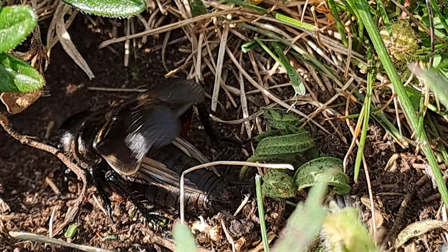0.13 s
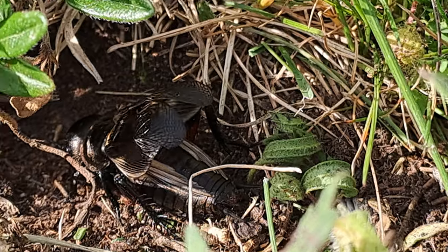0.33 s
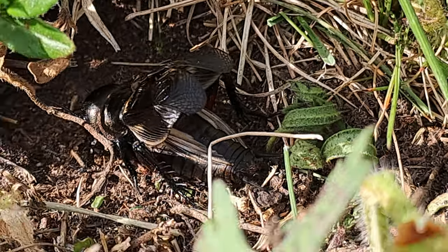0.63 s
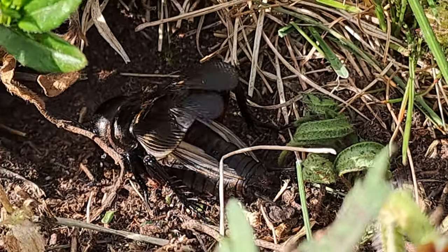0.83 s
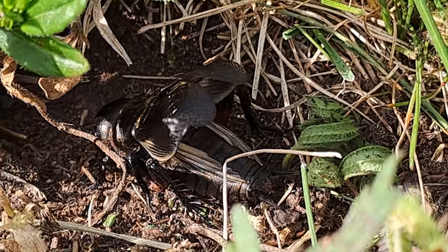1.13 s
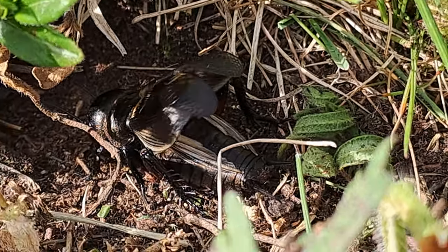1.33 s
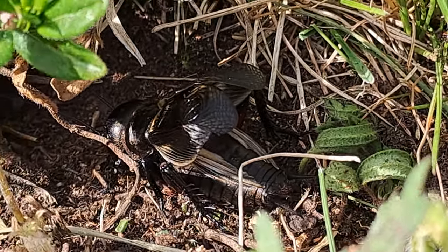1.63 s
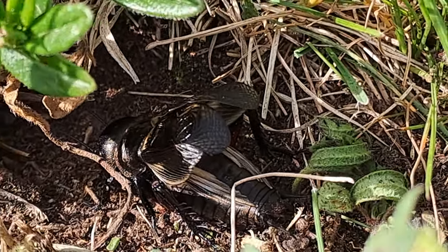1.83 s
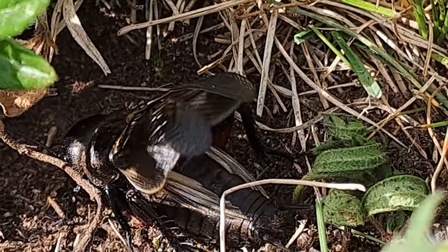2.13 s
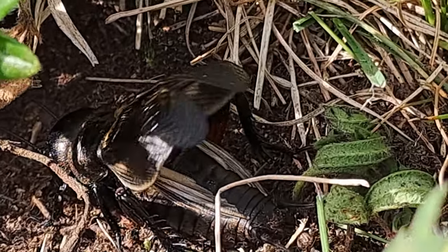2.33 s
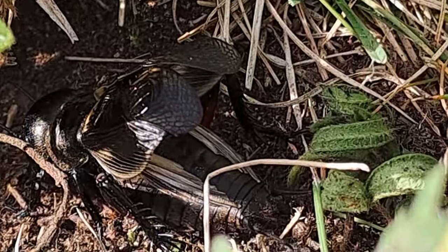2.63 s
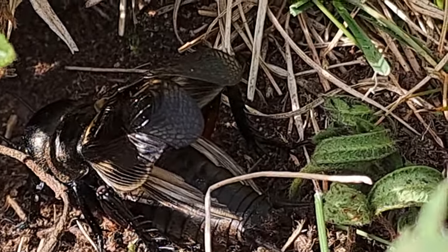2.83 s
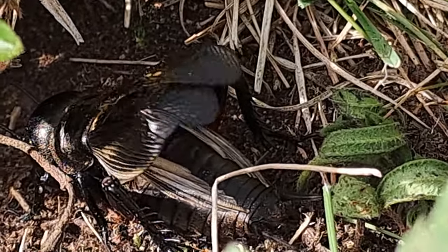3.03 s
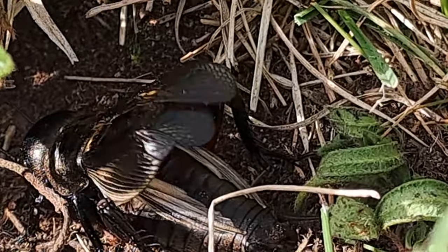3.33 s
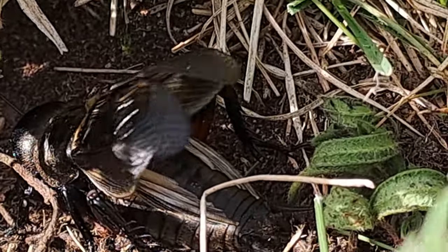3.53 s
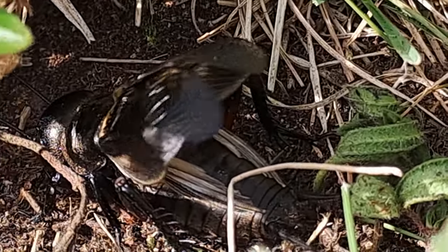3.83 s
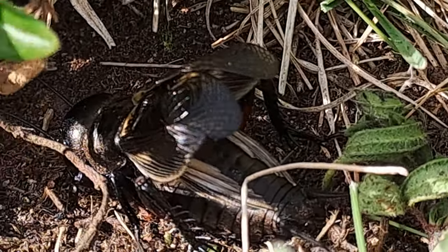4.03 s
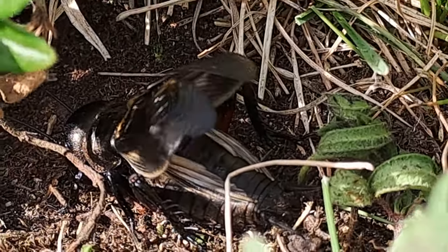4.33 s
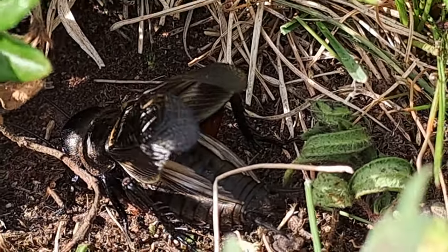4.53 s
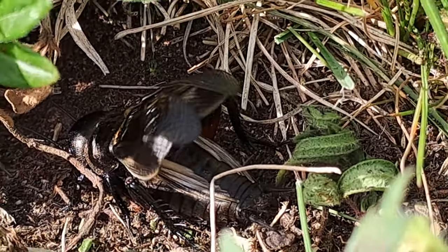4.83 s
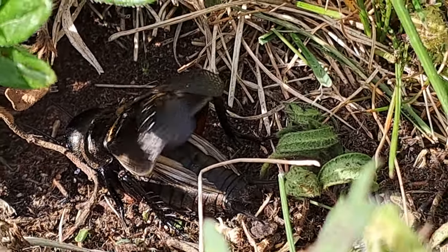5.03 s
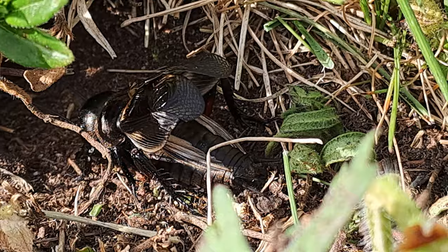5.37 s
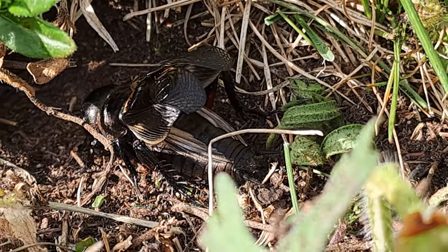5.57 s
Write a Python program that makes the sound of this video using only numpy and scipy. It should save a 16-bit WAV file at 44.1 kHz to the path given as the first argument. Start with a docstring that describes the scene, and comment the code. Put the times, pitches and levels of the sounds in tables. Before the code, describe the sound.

After a brief silence, one near field cricket trills sharp metallic chirps about three a second, with distant crickets and low buffeting wind.

```python
"""After a short silence, wind, meadow hiss and far crickets fade in, and a near cricket starts to chirp.
The hiss and the far chorus are coloured noise; the wind adds rumble, buffeting and pops at two microphone ports.
The near cricket sings four-stroke chirps: ringing tones that slow down, with scraping noise over them.
Three neighbours a few metres away sing steadier falling tones, and single hard eddies knock on one port.
"""
import sys
import numpy as np
from scipy import signal
from scipy.fft import rfft, irfft, next_fast_len
from scipy.io import wavfile
from scipy.ndimage import uniform_filter1d

SR = 44100
rng = np.random.default_rng(int(sys.argv[2]) if len(sys.argv) > 2 else 0)


def persist_wave(psi):
    """Save psi, clipped to +-1, as 16-bit WAV."""
    counts = np.round(np.clip(psi, -1, 1) * 32767).astype(np.int16)
    wavfile.write(sys.argv[1], SR, np.atleast_2d(counts).T)


N = 251370  # length in samples, 5.7 s


def gain_of(db):
    """Turns decibels into a factor to multiply by."""
    return 10 ** (np.asarray(db) / 20)


def evened(x):
    """Scales a sound so that its average strength (rms) is 1."""
    return x / np.sqrt(np.mean(x ** 2) + 1e-20)


def noise():
    """Plain hiss, drawn separately for each port."""
    return rng.standard_normal((2, N))


def coloured(x, points):
    """Filters each row to a given spectrum, ringing only after each kick; the result has rms 1."""
    point_hz, point_db = np.transpose(points)
    size = 2 * next_fast_len(x.shape[-1] // 2 + 2048)
    hz = np.fft.rfftfreq(size, 1 / SR)
    curve_db = np.interp(np.log(hz + 1), np.log(point_hz), point_db)
    cepstrum = irfft(np.log(gain_of(curve_db)), size)
    cepstrum[1:size // 2] *= 2  # this folding moves all the ringing to after the kick
    cepstrum[size // 2 + 1:] = 0
    response = np.exp(rfft(cepstrum))
    return evened(irfft(rfft(x, size) * response, size)[..., :x.shape[-1]])


def wobble(shape, ms):
    """Smooth random ups and downs of rms 1 that change over about ms milliseconds."""
    x = rng.standard_normal(shape)
    size = max(int(ms * SR / 1000), 1)
    for _ in range(3):
        x = uniform_filter1d(x, size)
    return evened(x)


def add(mix, s, sound):
    """Mixes a stereo sound in at time s, cut off at the end of the mix."""
    part = mix[:, round(s * SR):][:, :sound.shape[1]]
    part += sound[:, :part.shape[1]]


def ports(z, left_db, lead):
    """Gives a complex tone to both ports: left_db louder and lead radians earlier on the left."""
    left = z * gain_of(left_db / 2) * np.exp(1j * lead)
    right = z * gain_of(-left_db / 2)
    return np.real([left, right])


def echoes(x, t60, level_db):
    """Adds the scatter of grass and ground: a short dying tail of noise for each port."""
    t = np.arange(round(.08 * SR)) / SR
    tail = rng.standard_normal((2, len(t))) * gain_of(-60 * t / t60) * (t > .001)
    tail = tail / np.linalg.norm(tail[0])
    return x + gain_of(level_db) * signal.oaconvolve(x, tail, axes=1)[:, :N]


# Colour of the meadow hiss: (frequency [Hz], relative level [dB per Hz])
AIR_COLOUR = [(1000, -29.5), (2100, -19.5), (3400, -28), (8500, -23), (12500, -31), (13600, -36.5),
              (15900, -40)]
# Slow sag and return of the hiss's and neighbours' level: (time [s], level change [dB])
LEVEL_SAG = [(0, 2), (1.5, -2), (3, -3), (4.2, -1.5), (5.7, 4)]
AIR_BASE_DB = -64.5  # before the slow changes


def air():
    """Meadow hiss: coloured noise whose level sags mid-way and rises again, with small random drifts."""
    sag_db = np.interp(np.arange(N) / SR, *np.transpose(LEVEL_SAG))
    level_db = AIR_BASE_DB + 1.5 * wobble(N, 40.) + sag_db
    return gain_of(level_db) * coloured(noise(), AIR_COLOUR)


# Colour of many far crickets blurred together: (frequency [Hz], relative level [dB per Hz])
CHORUS_COLOUR = [(3500, -24), (3950, -2), (4400, 8), (4900, -1.5), (5200, -13), (5600, -44.5)]


def chorus():
    """Far crickets: a haze of noise whose level throbs quickly and swells more slowly at random."""
    throb_db = 4.5 * wobble((2, N), 10.5) + 1.2 * wobble((2, N), 65)
    return gain_of(-59.5 + throb_db) * coloured(noise(), CHORUS_COLOUR)


def eddies(per_s, spread_db):
    """Scattered pressure kicks of random sign, a few much larger, separate for each port."""
    size = gain_of(spread_db * np.minimum(rng.exponential(1, (2, N)), 3.5))
    happens = rng.random((2, N)) < per_s / SR
    return size * rng.choice([-1., 1.], (2, N)) * happens


# Separate puffs of buffeting at the port edges: (start [s], hold [s], level [dB])
PUFF_LIST = [(0.403, 0.018, -31), (0.573, 0.11, -37.5), (0.891, 0.028, -36.5), (1.026, 0.019, -32.5),
             (1.251, 0.041, -30.5), (1.355, 0.02, -28), (1.515, 0.022, -28), (1.661, 0.054, -29),
             (1.936, 0.073, -28), (2.148, .22, -23.5), (2.485, 0.25, -27.5), (2.793, 0.012, -24),
             (2.947, 0.036, -32), (3.101, .13, -25), (3.429, 0.037, -27.5), (3.569, 0.11, -27),
             (3.843, 0.04, -29.5), (3.94, 0.045, -30.5), (4.18, 0.034, -30.5), (4.547, 0.031, -35.5),
             (4.829, 0.037, -25), (5.111, 0.03, -32.5), (5.429, 0.051, -24.5), (5.631, 0.12, -24)]
PUFF_RISE_DB_PER_S, PUFF_FALL_DB_PER_S = 904, 403


def buffeting_db(t, steady_db):
    """Adds the power of each puff, which sets in fast, holds and dies away, to the steady buffeting."""
    power = gain_of(2 * steady_db)
    for s, hold, db in PUFF_LIST:
        rise_db = PUFF_RISE_DB_PER_S * np.maximum(s - t, 0)
        fall_db = PUFF_FALL_DB_PER_S * np.maximum(t - s - hold, 0)
        power = power + gain_of(2 * (db - rise_db - fall_db))
    return 10 * np.log10(power)


# Slow push of the wind, before finer changes: (time [s], rumble level [dB], steady buffeting level [dB])
WIND_PUSH = [(.19, -31.5, -47.5), (0.269, -10.5, -29.5), (.47, -17.5, -35), (.55, -30, -45),
             (.95, -29.5, -55.5), (1.212, -30.5, -42.5), (1.339, -17.5, -35), (1.45, -25.5, -37.5),
             (1.811, -20.5, -29), (2.42, -26.5, -38.5), (2.87, -26.5, -37), (3.029, -31.5, -37.5),
             (3.289, -24, -31), (3.81, -28.5, -33.5), (4.3, -30.5, -46.5), (4.66, -34, -41.5),
             (4.94, -23, -32), (5.05, -33, -47.5), (5.362, -27.5, -35), (5.69, -35.5, -31.5)]
# Which side the rumble leans to: (time [s], left over right [dB])
RUMBLE_SIDE = [(.17, 12), (.5, 2), (.7, -7.5), (5.7, -22)]
# Colour of the low rumble: (frequency [Hz], relative level [dB per Hz])
RUMBLE_COLOUR = [(15, -24.5), (30, -6), (50, 7.5), (80, 13), (130, 7), (200, 5.5), (350, -25.5),
                 (1200, -125)]
# Colour of the sharper buffeting, also used for the knocks: (frequency [Hz], relative level [dB per Hz])
BUFFET_COLOUR = [(60, -36.5), (150, -7), (280, 1.5), (500, -5.5), (800, -20.5), (1300, -37.5), (2200, -60),
                 (3500, -88), (6000, -135)]


def wind():
    """Lumpy noise makes the rumble, random kicks the buffeting; the strongest flaps crackle brightest."""
    t = np.arange(N) / SR
    s, push_db, steady_db = np.transpose(WIND_PUSH)
    rumble_db = np.interp(t, s, push_db)
    left_db = np.interp(t, *np.transpose(RUMBLE_SIDE))
    flap_db = buffeting_db(t, np.interp(t, s, steady_db))
    lumps = wobble((2, N), 8.14)

    rumble = evened(coloured(noise(), RUMBLE_COLOUR) * gain_of(4.13 * lumps))
    side_db = np.array([left_db, -left_db]) / 2
    rumble = rumble * gain_of(rumble_db + 0.13 * (flap_db + 20.0) + side_db)

    kicks = coloured(eddies(2500, 3.7) * gain_of(4.97 * lumps), BUFFET_COLOUR)
    front_db = 3.7 * lumps + 4. * wobble((2, N), 5.8)
    fronts = np.diff(eddies(130, 4.1) * gain_of(front_db), prepend=0)  # steeper, so brighter
    pops = coloured(fronts, BUFFET_COLOUR) * gain_of(0.83 * (flap_db + 30.0) - 7.)
    return np.tanh(rumble + (kicks + pops) * gain_of(flap_db + 2.5))  # the membranes give way softly


# The near cricket, one row a chirp: (end of stroke 3 [s], drag of stroke 2 [ms], wait for stroke 4 [ms],
# base levels of partials 1, 2 and 3 [dB])
CHIRP_ROWS = [(0.2451, 4, 35, -23, -39, -27.5), (.503, 0, 33, -23.5, -36, -26.5),
              (0.8463, 2, 35.2, -25, -42, -26), (1.1605, 4, 33.8, -24.5, -39.5, -25),
              (1.4528, 2.5, 34.5, -26.5, -37.5, -29), (1.7989, -1, 31.7, -26.5, -39.5, -28),
              (2.165, 2, 35, -28.5, -43, -27.5), (2.427, 1.5, 38.6, -30, -44.5, -30.5),
              (3.0495, 2, 35.5, -33.5, -47, -30.5), (3.3481, 1, 35.3, -29.5, -42.5, -29.5),
              (3.6675, 2, 35.2, -34, -44, -28.5), (3.9695, -1, 35.7, -28, -42.5, -27),
              (4.3618, 6.3, 36.6, -26, -40, -26.5), (4.6404, 6.5, 33.5, -28, -41, -26),
              (4.8975, -2.5, 34.7, -24, -42.5, -26), (5.1416, 2, 37, -24.5, -39.5, -23),
              (5.5344, 4, 36, -25.5, -38, -25.5)]
# The four strokes of a chirp: (basic length [ms], levels of partials 1, 2, 3 over the chirp's [dB],
# their change after a missed lock [dB])
STROKE_PATTERN = [(15.5, (-7, 2.5, -9), (0, 0, 0)), (16.3, (-0.38, 2.1, -1.2), (-3.1, 2.7, -13)),
                  (15.2, (0, -1.8, 0), (1.7, 10, -.5)), (15, (0.58, -1.6, 0.56), (0, 0, 0))]
FIRST_LEAD_MS, SECOND_LEAD_MS = 57., 31.  # strokes 1 and 2 end this long before stroke 3, before any drag
MISS_MS = 3.4  # a drag over this tends to miss the lock
STRETCH, SQUEEZE = 0.94, 0.33  # shares of the drag that lengthen stroke 2 and shorten stroke 3


def strokes():
    """Spells out each chirp as four strokes: (end s, length ms, base dB of the three partials)."""
    for third, drag, wait, *chirp_db in CHIRP_ROWS:
        missed = 1 / (1 + np.exp(2 * (MISS_MS - drag)))  # smoothly from 0 to 1
        ends = [-FIRST_LEAD_MS, drag - SECOND_LEAD_MS, 0, wait]
        longer = [0, STRETCH * drag, -SQUEEZE * drag, 0]
        for end, more, (ms, step_db, miss_db) in zip(ends, longer, STROKE_PATTERN):
            levels = chirp_db + np.array(step_db) + missed * np.array(miss_db)
            yield third + end / 1000, ms + more, *levels


# Basic pitch of strokes 2 to 4: (share of the stroke [0 to 1], tooth rate [Hz])
TOOTH_GLIDE = [(0, 4460), (.3, 4620), (.6, 4510), (.85, 4320), (1, 4110)]
# How each partial reaches the ports on average: (left over right [dB], left leads by [rad])
PARTIAL_PORTS = [(4.5, 2.75), (-2, 2.59), (0.5, 0.37)]
# Colour of the scraping noise: (frequency [Hz], relative level [dB])
SCRAPE_COLOUR = [(3000, -29), (5000, -7), (6500, -10), (8000, -3.5), (10500, -2.5), (12000, 4.5),
                 (14000, -1), (16000, -11.5)]
OPENING_RASP = .6  # the first stroke rasps evenly, without ticks


def cricket():
    """The scraper runs down the file and slows; it stumbles at first, then locks and the wing rings hard."""
    tone, grit = np.zeros((2, N)), np.zeros((2, N))
    last = -1
    for end, ms, *levels in strokes():
        opening = end - last > .1  # the first stroke of a chirp is soft, clean and even
        last = end
        t = np.arange(round(ms * SR / 1000)) / SR
        u, left = t / t[-1], t[-1] - t  # share done, seconds left
        start = end - t[-1]
        pitch, late, jump = rng.standard_normal(3)
        lock = .002 if opening else 0.00697 + 0.00061 * late  # seconds into the stroke
        locked = 1 / (1 + np.exp((lock - t) / 0.00037))
        loose = (.6 if opening else 1) * (1 - .7 * locked)

        hz = 4500 - 400 * u ** 2.6 if opening else np.interp(u, *np.transpose(TOOTH_GLIDE))
        hz = hz * (1 + .006 * pitch + 0.023 * loose * wobble(len(t), 0.65))
        turns = 2 * np.pi * np.cumsum(hz) / SR
        turns = turns + 1.85 * jump * locked * (not opening)  # the phase slips at the lock
        edge = (1 - np.exp(-t / 0.0026)) * (1 - np.exp(-left / 0.0016))

        lift_db = [3., 3., 10.]  # each partial swells at the lock
        part = 0
        for k, (db, lift, (left_db, lead)) in enumerate(zip(levels, lift_db, PARTIAL_PORTS), 1):
            tilt, twist = rng.standard_normal(2)  # the raised wings never aim quite the same way
            flutter_db = 3.1 * loose * wobble(len(t), 0.83)
            size = gain_of(db + 1.0 + 2.6 * u - lift * (1.5 - locked) + flutter_db)
            partial = edge * size * np.exp(1j * k * turns)
            part = part + ports(partial, left_db + 1.6 * tilt, lead + 0.47 * twist)
        add(tone, start, part)

        # ticks where the scraper catches, locks and leaves, over a rasp of missed teeth
        tick_list = [(0.6, 0.0011), (0.5, lock), (0.74, t[-1] - .0005)]
        ticks = sum(a * np.exp(-abs(t - at) / 0.0008) for a, at in tick_list)
        effort = gain_of(max(levels[1:]) + 1.8 * pitch)
        rasp = OPENING_RASP * edge if opening else ticks + 0.43 * edge
        add(grit, start, effort * rasp * np.ones((2, 1)))

        # the wings brush again as they open
        back = np.arange(round(0.02 * SR)) / SR
        touches = rng.uniform([.003, .011], [.008, .015])
        brush = 0.057 + sum(0.11 * np.exp(-abs(back - at) / 0.00054) for at in touches)
        add(grit, end + 0.00059, effort * brush * np.ones((2, 1)))

    a, b = coloured(noise(), SCRAPE_COLOUR)
    scrape = np.array([a, .5 * a + 0.95 * b])  # the two ports hear partly the same noise
    grit = gain_of(-10.5 + 3.44 * wobble(N, 1.34)) * grit * scrape
    return echoes(tone + grit, t60=.04, level_db=-16)


# Three neighbours, one row each: (voice, strokes, chirps)
# voice: (basic top pitch [Hz], fall [Hz], partial 2 [dB], partial 3 [dB], left over right [dB], left leads [rad])
# strokes: (middle after the first stroke's [s], length [ms], base level [dB])
# chirps: (middle of the first stroke [s])
NEIGHBOUR_ROWS = [ ((4318.5, 419, -25, -31, -3.3, -0.97), [(0, 14, -43), (.030, 20, -39), (.063, 21, -38.5),
                  (.098, 20, -39.5)],
                  [0.22, 0.436, 0.7, 0.954, 1.242, 1.527, 1.743, 2.01, 2.255, 2.528, 2.778, 3.036, 3.289, 3.513, 3.786, 4.051, 4.282, 4.532, 4.77, 5.027, 5.251, 5.452, 5.687]),
                  ((4591, 214, -28, -36, -5.5, 2), [(0, 32, -45), (.033, 15, -42), (.067, 16, -42)],
                  [0.295, 0.481, 0.967, 1.22, 1.517, 1.718, 1.974, 2.19, 2.421, 2.663, 2.895, 3.121, 3.338, 3.567, 3.779, 4.001, 4.214, 4.434, 4.670, 4.894, 5.165, 5.422]),
                  ((4007, 254, -27, -33, 2, 1.5), [(0, 14, -53), (.036, 16, -46.5), (.074, 21, -48)],
                  [1.12, 2.353, 2.668, 3.370, 3.671, 3.953, 4.641, 5.367]), ]
SHIFT_DB = 12.  # along a stroke partial 2 gains this much and partial 3 loses it


def neighbour(voice, stroke_rows, chirps):
    """Each stroke is a steady tone that falls, with weak upper partials and a tick at the catch."""
    top_hz, fall_hz, second_db, third_db, left_db, lead = voice
    out = np.zeros((2, N))
    for s in chirps:
        for after, ms, db in stroke_rows:
            u = np.linspace(0, 1, round(ms * SR / 1000))  # share of the stroke
            drift, slip = rng.standard_normal(2)
            db = db + np.interp(s, *np.transpose(LEVEL_SAG)) + 0.45 * slip
            hz = (top_hz - fall_hz * abs((u - .2) / 0.8) ** 2.8) * (1 + 0.0041 * drift)
            if after == 0:
                hz = hz - 140  # the first stroke is lower
            turns = 2 * np.pi * np.cumsum(hz) / SR
            size = gain_of(db + 1.03 * wobble(len(u), 1.2)) * signal.windows.tukey(len(u), .45)

            flicker_db = 5. * wobble(len(u), 2.5)  # the upper partials come and go
            shift_db = SHIFT_DB * (u - .5)
            partials_db = [0, second_db + flicker_db + shift_db, third_db + flicker_db - shift_db]
            part = 0
            for k, partial_db in enumerate(partials_db, 1):
                partial = size * gain_of(partial_db) * np.exp(1j * k * turns)
                part = part + ports(partial, left_db, k * lead)

            stroke_ms = u * ms
            tick = np.exp(-((stroke_ms - 1) / .15) ** 2) * np.sin(2 * np.pi * 10.8 * stroke_ms)  # 10.8 kHz
            add(out, s + after - ms / 2000, part + gain_of(db - 12.0 + 3. * drift) * tick)
    return echoes(out, t60=.11, level_db=-8)


# Single hard eddies: (time [s], level before a common boost [dB])
KNOCK_LIST = [(0.354, -20.5), (1.249, -24), (2.36, -21), (2.151, -23), (5.427, -24), (1.669, -25),
              (1.537, -27), (.398, -26), (1.925, -23.5), (2.289, -19), (2.498, -25), (2.671, -23.5),
              (3.46, -18), (3.733, -21)]


def knocks():
    """Each hard eddy is one steep front on a random port, ringing with the buffeting's colour."""
    click = np.zeros(N)
    click[0] = 1
    front = np.diff(coloured(click, BUFFET_COLOUR)[:2000])
    front = front / abs(front).max()
    out = np.zeros((2, N))
    for s, db in KNOCK_LIST:
        side = np.eye(2)[rng.integers(2)][:, None]
        add(out, s, side * gain_of(db + 11.5) * front)
    return out


def scene():
    """Adds up all sources at the two ports."""
    neighbours = sum(neighbour(*row) for row in NEIGHBOUR_ROWS)
    return air() + chorus() + wind() + cricket() + neighbours + knocks()


START_S, EDGE_HZ = .1705, 15970  # end of the silence, top of the passed band


def record(dry):
    """Opens with silence and a quick fade-in, then cuts the highest treble."""
    fade = np.clip((np.arange(N) / SR - START_S) / 0.0018, 0, 1)
    low_pass = signal.firwin(2047, EDGE_HZ, window=("kaiser", 9), fs=SR)
    return signal.oaconvolve(dry * fade, low_pass[None], "same")


dry = scene()
out = record(dry)
persist_wave(out)
```